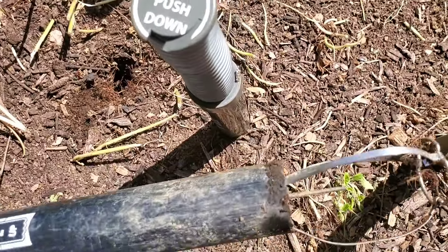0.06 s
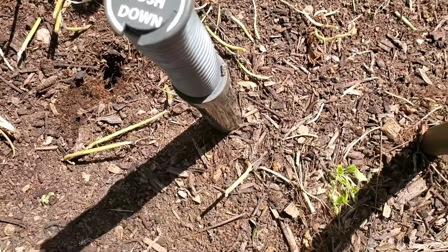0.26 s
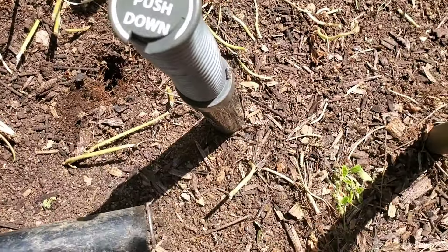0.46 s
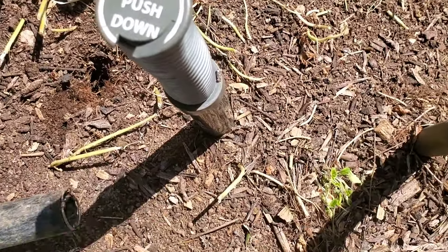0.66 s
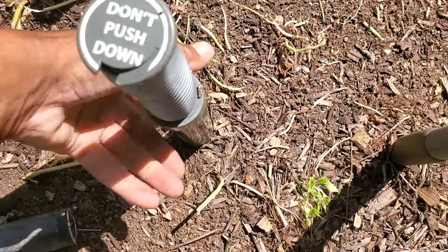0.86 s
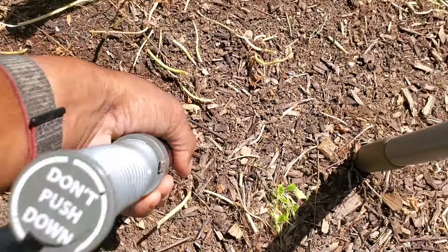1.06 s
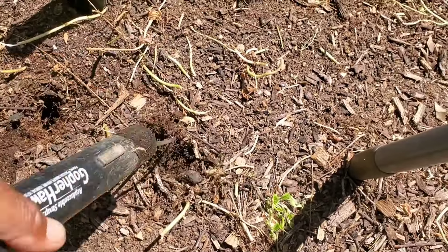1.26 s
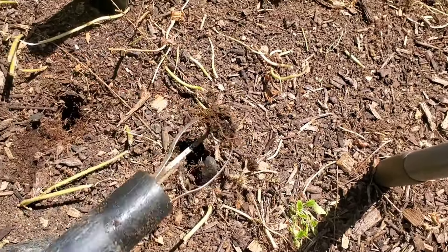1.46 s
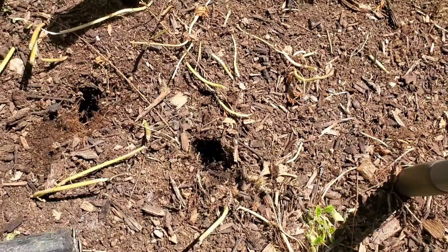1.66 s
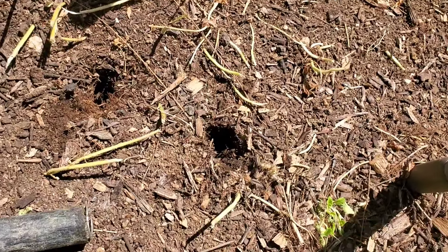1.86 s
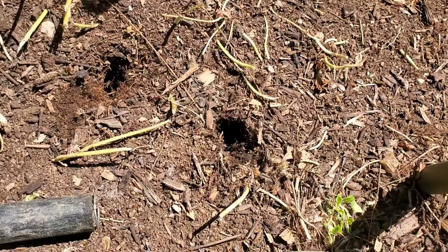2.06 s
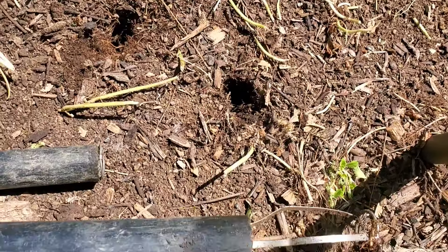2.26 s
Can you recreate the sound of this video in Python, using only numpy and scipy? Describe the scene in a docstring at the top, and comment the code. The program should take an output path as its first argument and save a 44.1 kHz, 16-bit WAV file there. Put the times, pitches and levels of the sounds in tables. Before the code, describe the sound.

A metal gopher trap, very close and slightly left, snaps after a tiny tick: hard cracks at 0.24-0.27 seconds, with a bright spring rattle fading by about 0.5. Sharp latch clicks and hollow tube clacks come at 0.73-0.85. From 1.0 to 1.5, low handling thumps and wind flutter swell, with gritty scrapes and small crackles near 1.07-1.3. Softer rumble and faint garden air remain until 2.3.

```python
"""A short bright tick, then a few hard blows and a rattling spring, close to the microphone: a metal gopher trap
snaps on garden mulch, then clicks and clacks. Gritty scrapes and small crackles follow as it is worked in the soil.
Blows, spring and soil are coloured random contacts; the metal, the coil and one tube note ring as decaying sines.
Rumble and flutter are filtered noise, wind and handling on the microphone; faint echoes and garden air lie behind."""
import sys
import numpy as np
from scipy import signal
from scipy.fft import rfft, irfft
from scipy.io import wavfile
from scipy.ndimage import uniform_filter1d

SR = 44100
rng = np.random.default_rng(int(sys.argv[2]) if len(sys.argv) > 2 else 0)


def persist_wave(psi):
    """Save psi, clipped to +-1, as 16-bit WAV."""
    counts = np.round(np.clip(psi, -1, 1) * 32767).astype(np.int16)
    wavfile.write(sys.argv[1], SR, np.atleast_2d(counts).T)


N = 101429  # length [samples]

# Decays are given as t60: the time to fall by 60 dB. Colours give only the shape of a spectrum.
# hard blows of the snap: (time [s], level [dB], t60 [s])
SNAP_BLOWS = [(.2402, -16.5, 0.058), (.2436, -9, 0.044), (.2502, -7.5, 0.02), (.2686, -5.5, 0.021),
              (.2815, -23, 0.071), (.3160, -22, 0.095)]
# body of the trap under a blow: (frequency [Hz], relative level [dB])
BLOW_SPECTRUM = [(60, -13), (140, -9.5), (250, 1), (350, 0), (425, 3), (530, -1.5), (640, 4), (730, -1),
                 (850, 2.5), (1050, -4.5), (1280, -6), (1700, -0.5), (2200, -6), (3400, -4), (5500, -11),
                 (8300, -27), (11000, -28), (15000, -14)]
# surges of the rattling spring: (time [s], level [dB], t60 [s])
SPRING_SURGES = [(0.2402, -24.5, 0.071), (0.249, -17.5, .12), (0.2563, -15.5, 0.16), (0.268, -14.5, 0.27),
                 (0.2807, -17, 0.23), (0.292, -19.5, 0.18), (0.303, -18, .2), (0.317, -18, .18),
                 (0.33, -21.5, 0.14), (0.337, -19.5, .13), (.3520, -26.5, .13)]
# body of the spring's rattle: (frequency [Hz], relative level [dB])
SPRING_SPECTRUM = [(120, -41.5), (280, -16.5), (450, -11.5), (620, 1), (800, -6), (1150, -7.5), (1700, -1),
                   (2050, -4.5), (2550, 3), (3300, 2.5), (3800, 1.5), (4600, -6), (6000, -12), (7200, -10),
                   (9000, -25.5)]
# fizz of the spring: (frequency [Hz], relative level [dB])
FIZZ_SPECTRUM = [(3000, -24), (5000, 3.5), (7000, -1), (8300, -3.5), (9500, -2), (11700, -1.5), (14500, -4),
                 (16000, -17)]
# ringing of the trap's metal: (frequency [Hz], relative level [dB], t60 [s])
METAL_MODES = [(662, -4, 0.22), (884, -12.5, 0.37), (1687, 7.5, 0.14), (1740, -2, .15), (2400, -6.5, 0.28),
               (2454, 0, 0.34), (2604, -0.5, .22), (2630, -19, 0.54), (2875, -1.5, .22), (3406, 1, 0.18),
               (4090, 0, .13), (4430, -15, .15), (4570, -4, .13)]
# bright latch clicks: (time [s], level [dB], swell [s], t60 [s])
LATCH_CLICKS = [(0.713, -42, .002, 0.27), (0.73, -20.5, 0.0014, 0.015), (0.7545, -29.5, 0.00073, 0.02),
                (0.7709, -13, 0.0018, 0.023), (0.7816, -27.5, .001, .035), (.7940, -22.5, .002, 0.02),
                (0.854, -42, .008, .05)]
# colour of the clicks: (frequency [Hz], relative level [dB])
CLICK_SPECTRUM = [(200, -26), (550, -20), (800, -4.5), (1080, -16), (1700, -1), (2200, -0.5), (3500, 3),
                  (4800, -1.5), (7000, -2.5), (8500, -1.5), (12000, -2.5), (15000, -5)]
# hollow clacks of the tube: (time [s], level [dB], t60 [s])
TUBE_CLACKS = [(.7295, -34, 0.13), (.7826, -17, 0.061), (.7895, -16.5, .05), (.8035, -24.5, 0.097),
               (.8490, -38.5, .08)]
# colour of the clacks: (frequency [Hz], relative level [dB])
CLACK_SPECTRUM = [(100, -9), (320, -10.5), (550, 1.5), (660, -4), (800, -0.5), (1100, -14.5), (1500, -5.5),
                  (1850, -3.5), (2200, 0), (2600, 1), (4200, -5), (6500, -14), (9000, -25), (15000, -34)]
# twigs and crumbs cracking: (time [s], level [dB], t60 [s])
TWIG_CRACKLES = [(.3675, -34, 0.012), (.4645, -45, 0.013), (.9328, -45.5, 0.032), (.9712, -52, 0.031),
                 (1.0695, -30.5, 0.0099), (1.1283, -43, 0.01), (1.2445, -47, 0.024), (1.2702, -29.5, 0.011),
                 (1.278, -34, 0.011), (1.704, -51, 0.052), (1.7319, -47.5, 0.045), (1.7728, -42.5, 0.04),
                 (2.073, -54, 0.024), (2.112, -53, 0.029)]
# colour of the crackles: (frequency [Hz], relative level [dB])
CRACKLE_SPECTRUM = [(500, -33), (1400, -16), (2300, -4.5), (4000, 2.5), (6000, -2), (8000, -5.5),
                    (12000, 0.5), (15000, 1)]
# a short bright tick at the start, then gritty scrapes in the soil:
# (time [s], level [dB], swell [s], t60 [s], pitch [Hz])
TICK_AND_SCRAPES = [(0.0143, -29, 0.00065, 0.01, 3240), (1.152, -39, 0.029, .12, 4000),
                    (1.278, -33.5, 0.012, 0.045, 3610), (1.303, -42.5, 0.0074, 0.059, 2700)]
# rustle of the mulch: (time [s], level [dB])
MULCH_RUSTLE = [(0, -55), (.13, -65), (.19, -50.5), (.24, -49.5), (.45, -61), (.52, -59.5), (.67, -56),
                (.70, -59), (.86, -53.5), (.95, -61.5), (.99, -52.5), (1.15, -50.5), (1.21, -50.5),
                (1.30, -52.5), (1.40, -55), (1.58, -53.5), (1.64, -63), (1.79, -60.5), (1.88, -68.5),
                (2.10, -62.5), (2.17, -70), (2.3, -69.5)]
# colour of the rustle: (frequency [Hz], relative level [dB])
RUSTLE_SPECTRUM = [(400, -6), (1200, -7.5), (2500, -1), (4500, -2), (7600, -7), (11500, -1), (15000, -3)]
# wind and handling: (time [s], deep rumble [dB], flutter before FLUTTER_DB [dB], left minus right [dB])
MIC_RUMBLE = [(0, -42, -56, 0), (.2, -44, -56, 0), (.35, -48, -57, 0), (.6, -53, -63, 0),
              (.66, -34, -55, 0), (.75, -39, -51, 0), (.84, -32, -47, 2), (.97, -42, -51, 0),
              (1.01, -42, -55, -2), (1.04, -29, -39, -4), (1.2, -29, -33, -4), (1.3, -31, -41, -4),
              (1.41, -33, -49, -3), (1.6, -38, -54, 0), (1.8, -37, -49, 2), (1.93, -42, -55, 2),
              (2.05, -38, -58, 1), (2.15, -47, -58, 1), (2.3, -43, -53, 0)]
# buffets on the microphone: (time [s], deep rumble [dB], flutter before FLUTTER_DB [dB], half-length [s])
MIC_BUFFETS = [(.027, -34, -50, .015), (.088, -37, -56, .012), (.142, -37, -45, .012),
               (.246, -28, -42, .012), (.45, -38, -52, .025), (.548, -39, -58, .015), (.73, -36, -40, .012),
               (.79, -26, -37, .02), (.90, -32, -35, .018), (.95, -48, -43, .012), (1.062, -20, -35, .011),
               (1.12, -24, -31, .014), (1.165, -25, -37, .015), (1.212, -27, -26, .012),
               (1.248, -22, -32, .01), (1.30, -26, -50, .015), (1.368, -26, -35, .013),
               (1.42, -27, -52, .012), (1.449, -22, -39, .008), (1.543, -27, -47, .013),
               (1.665, -27, -47, .018), (1.71, -31, -50, .012), (1.757, -31, -42, .013),
               (1.82, -31, -41, .012), (1.85, -29, -44, .012), (2.005, -30, -51, .013),
               (2.06, -33, -54, .025), (2.25, -36, -51, .015)]
# colour of the deep rumble: (frequency [Hz], relative level [dB])
RUMBLE_SPECTRUM = [(15, -28), (28, -13.5), (45, 1), (68, 3), (100, -3), (150, -10), (260, -26.5),
                   (600, -62)]
# colour of the flutter above it: (frequency [Hz], relative level [dB])
FLUTTER_SPECTRUM = [(70, -8), (140, 3), (260, 3), (380, -7), (550, -16.5), (900, -22.5), (2000, -43.5)]
# colour of the garden air: (frequency [Hz], relative level [dB])
AIR_SPECTRUM = [(100, 9), (400, 6.5), (800, -6.5), (1400, -2.5), (2200, -4), (3300, 1.5), (5000, -6.5),
                (6500, -6), (7600, -55), (10000, -47), (15000, -16)]

# fizz: lift [dB], fade [dB/s], its t60 as a share of the surge's t60
TREBLE_DB, TREBLE_FADE_DB_PER_S, TREBLE_T60_SHARE = 3.5, 75, 0.5
RATTLE_PER_S, RATTLE_SCATTER_DB = 5000, 3.5
# chatter: approximate steps per second, swing per unit of random step
CHATTER_HZ, CHATTER_DB = 260.3, 1.5
# the spring's many high modes
COIL_LOW_HZ, COIL_HIGH_HZ, COIL_T60_S, COIL_DB = 2990, 14440, .035, -4.5
RING_DB = -11.5
NOTE_HZ, NOTE_DB, NOTE_T60_S = 783, -56, 1.8
# the right port hears each part later
BLOW_LAG_S, SPRING_LAG_S, LATCH_LAG_S = 0.0002, 0.0004445, .00044
SCRAPE_WIDTH_OCT = 0.1
LEFT_DB = 1.9  # trap and soil, left minus right
DEEP_DB, FLUTTER_DB = 0, 0.5
RUMBLE_EVENNESS = .45  # 0 leaves the swings of the noise, 1 flattens them
YARD_DB, YARD_T60_S = -32.5, .7
AIR_DB = -63
TOP_HZ = 15200


def snap():
    """Hard blows on the tube; the spring rattles on, losing its treble, and sets the metal ringing."""
    blows = colour(grains(9800, 0.88, like=1.0) * strikes(SNAP_BLOWS), BLOW_SPECTRUM)
    bursts = chatter()
    rattle = grains(RATTLE_PER_S, RATTLE_SCATTER_DB, like=0.61) * strikes(SPRING_SURGES) * bursts

    age = np.maximum(np.arange(N) / SR - SPRING_SURGES[0][0], 0)
    short_surges = [(at, db, t60 * TREBLE_T60_SHARE) for at, db, t60 in SPRING_SURGES]
    fizz_level = strikes(short_surges) * undb(TREBLE_DB - TREBLE_FADE_DB_PER_S * age)
    fizz = fizz_level * np.sqrt(bursts) * grains(12000, 2.0, like=0.5)

    spring = colour(rattle, SPRING_SPECTRUM) + colour(coil(fizz), FIZZ_SPECTRUM) + ring(rattle)
    return late(blows + note(), BLOW_LAG_S) + late(spring, SPRING_LAG_S)


def chatter():
    """Loose metal hits in quick uneven bursts: a flickering gain of rms 1."""
    step_length = int(SR / CHATTER_HZ)
    levels = np.clip(rng.standard_normal(N // step_length + 1), -2, 2)
    steps = levels[np.arange(N) // step_length]
    return unit(undb(CHATTER_DB * uniform_filter1d(steps, step_length // 4)))


def coil(force):
    """Contacts with the short, dense ring of the spring's high modes."""
    t = np.arange(SR // 5) / SR
    modes = 0
    for place, turn in rng.random(size=(70, 2)):
        hz = COIL_LOW_HZ + (COIL_HIGH_HZ - COIL_LOW_HZ) * place
        modes = modes + np.sin(2 * np.pi * (hz * t + turn))
    modes = unit(modes * np.exp(-np.log(1000) * t / COIL_T60_S)) / np.sqrt(len(t))
    return force + undb(COIL_DB) * signal.fftconvolve(force, modes[None], axes=1)[:, :N]


def ring(force):
    """The metal's decaying modes, driven by the contacts, with separate phases at each port."""
    t = np.arange(N) / SR
    phases = rng.uniform(0, 2 * np.pi, (len(METAL_MODES), 2, 1))
    modes = 0
    for (hz, db, t60), phase in zip(METAL_MODES, phases):
        decay = np.exp(-np.log(1000) * t / t60)
        modes = modes + undb(db) * decay * np.sin(2 * np.pi * hz * t + phase)
    return undb(RING_DB) * signal.fftconvolve(force, unit(modes) / np.sqrt(N), axes=1)[:, :N]


def note():
    """One long, faint ring of the tube lingers after the hardest blow."""
    return strike(SNAP_BLOWS[3][0], NOTE_DB, NOTE_T60_S) * np.sin(2 * np.pi * NOTE_HZ * np.arange(N) / SR)


def latch():
    """Metal slides and clicks home; the tube answers with hollow clacks."""
    slide = sum(strike(at, db, t60, swell) for at, db, swell, t60 in LATCH_CLICKS)
    clicks = colour(coil(slide * grains(12000, 1.8, like=.3)), CLICK_SPECTRUM)
    clacks = colour(strikes(TUBE_CLACKS) * grains(6000, 2.7, like=0.27), CLACK_SPECTRUM)
    return late(clicks + clacks, LATCH_LAG_S)


def soil():
    """Mulch rustles and twigs crack; narrow bands of grains make a bright tick, then gritty scrapes."""
    rustle = colour(grains(5700, 4, like=0.29), RUSTLE_SPECTRUM) * curve(MULCH_RUSTLE)
    cracks = grains(18000, 2.4, like=0.086) * strikes(TWIG_CRACKLES, swell=.0001)
    out = rustle + colour(cracks, CRACKLE_SPECTRUM)
    for at, db, swell, t60, hz in TICK_AND_SCRAPES:
        below = hz * 2 ** (-2 * SCRAPE_WIDTH_OCT)
        above = hz * 2 ** SCRAPE_WIDTH_OCT
        band = [(hz / 3, -36), (below, -10), (hz, 0), (above, -7), (hz * 2, -20)]
        out = out + colour(grains(2500, 4, like=0.18) * strike(at, db, t60, swell), band)
    return out


def rumble():
    """Wind and handling shake the microphone: a deep rumble and a flutter above it, with short buffets."""
    t, out = np.arange(N) / SR, 0
    layers = ((1, DEEP_DB, RUMBLE_SPECTRUM, 210), (2, FLUTTER_DB, FLUTTER_SPECTRUM, 640))
    for column, db, points, edge_hz in layers:
        power = curve(MIC_RUMBLE, column) ** 2
        for row in MIC_BUFFETS:
            power = power + undb(row[column]) ** 2 * np.exp(-((t - row[0]) / row[3]) ** 2)
        lowpass = signal.butter(3, edge_hz, fs=SR, output="sos")
        turbulence = unit(signal.sosfilt(lowpass, eddies(points)))
        out = out + undb(db) * np.sqrt(power) * turbulence
    # half of the level difference goes to each side
    return out * np.sqrt(curve(MIC_RUMBLE, axis=3)) ** np.array([[1], [-1]])


def eddies(points):
    """Low turbulence of fairly even strength, mostly different at each port."""
    x = colour(noise(.1), points)
    swings = np.abs(signal.hilbert(x, 2 ** 17))[:, :N]
    return unit(x / swings ** RUMBLE_EVENNESS)


def yard(x):
    """Faint scattered echoes from fences and plants, as a decaying noise tail."""
    points = [(100, -11.5), (700, 8), (3000, -6), (7000, -13), (15000, -12.5)]
    tail = colour(noise(0), points) * strike(0.02, 0, YARD_T60_S, swell=0.0026)
    return undb(YARD_DB) * signal.fftconvolve(x, unit(tail) / np.sqrt(N), axes=1)[:, :N]


def air():
    """Steady garden air: faint coloured noise, mostly different at each port."""
    return undb(AIR_DB) * colour(noise(0.12), AIR_SPECTRUM)


def grains(per_s, scatter_db, like):
    """Dense tiny contacts of uneven size and random sign, rms 1."""
    size = undb(scatter_db * np.minimum(rng.exponential(size=(3, N)), 4))
    sign = np.sign(rng.standard_normal((3, N)))
    hits = rng.random((3, N)) < per_s / SR
    return unit(ports(sign * size * hits, like))


def noise(like):
    """Smooth stereo noise."""
    return ports(rng.standard_normal((3, N)), like)


def ports(x, like):
    """Three unrelated signals become a left and a right that share a part (like: 0 none, 1 all)."""
    return np.sqrt(like) * x[0] + np.sqrt(1 - like) * x[1:]


def strike(at, db, t60, swell=0.00058):
    """Envelope that swells up to its moment and dies away exponentially."""
    t = np.arange(N) / SR - at
    return undb(db) * np.exp(np.minimum(t / swell, -np.log(1000) * t / t60))


def strikes(rows, swell=.0004):
    """Joint envelope of (time [s], level [dB], t60 [s]) rows, summed in power."""
    return np.sqrt(sum(strike(*row, swell) ** 2 for row in rows))


def colour(x, points):
    """Causal minimum-phase filter of unit power through (frequency [Hz], level [dB]) points."""
    size, p = 2 ** 17, np.array(points)
    hz = np.maximum(np.fft.rfftfreq(size, 1 / SR), 1)
    gain = unit(undb(np.interp(np.log(hz), np.log(p[:, 0]), p[:, 1])))
    # folding the cepstrum forward makes the filter causal
    cepstrum = irfft(np.log(gain))
    cepstrum[1:size // 2] *= 2
    cepstrum[size // 2 + 1:] = 0
    return irfft(rfft(x, size) * np.exp(rfft(cepstrum)))[..., :N]


def late(x, lag):
    """Delay the right channel by a lag in seconds, by turning its phases."""
    hz = np.fft.rfftfreq(2 ** 17, 1 / SR)
    right = irfft(rfft(x[1], 2 ** 17) * np.exp(-2j * np.pi * hz * lag))[:N]
    return np.array([x[0], right])


def curve(rows, axis=1):
    """Gain over time from one dB column of a table."""
    rows = np.array(rows)
    return undb(np.interp(np.arange(N) / SR, rows[:, 0], rows[:, axis]))


def undb(db):
    """Decibels to gain."""
    return 10 ** (np.asarray(db) / 20)


def unit(x):
    """Scale to rms 1."""
    return x / np.sqrt(np.mean(x ** 2))


def scene():
    """Trap and soil close by, slightly to the left, over yard echoes, rumble and garden air."""
    balance = undb(np.array([[LEFT_DB], [-LEFT_DB]]) / 2)
    near = (snap() + latch() + soil()) * balance
    return near + yard(near) + rumble() + air()


def record(dry):
    """Peaks beyond full scale clip, then a steep low-pass cuts the top."""
    lowpass = signal.ellip(10, .2, 70, TOP_HZ, fs=SR, output="sos")
    return signal.sosfilt(lowpass, np.clip(dry, -1, 1))


dry = scene()
out = record(dry)
persist_wave(out)
```